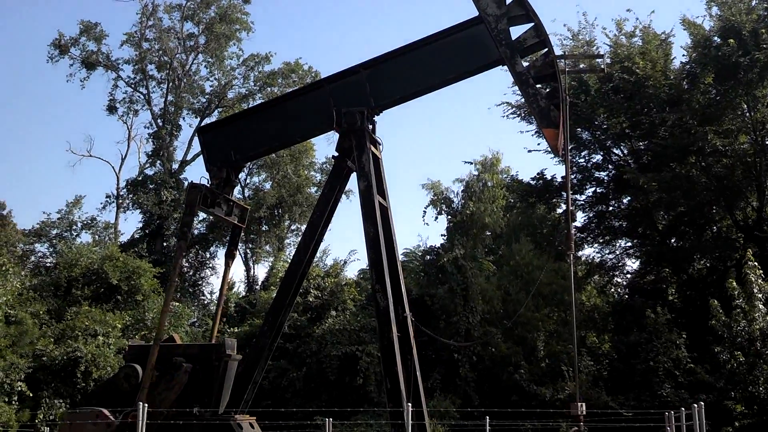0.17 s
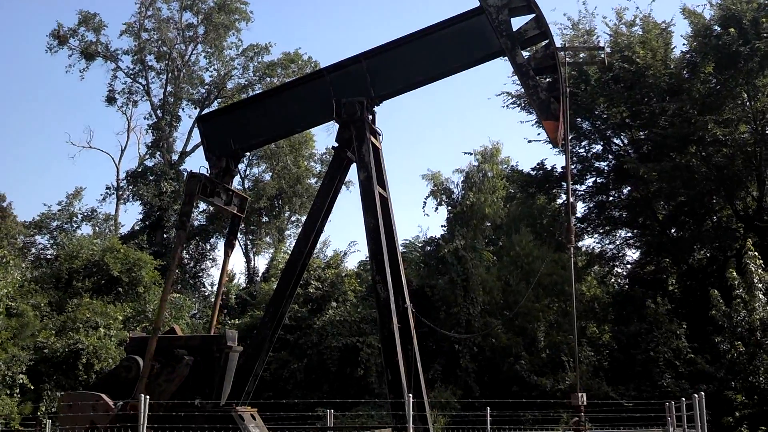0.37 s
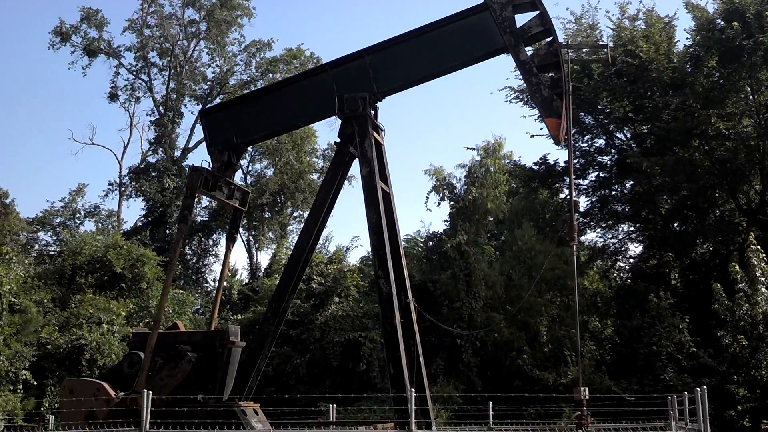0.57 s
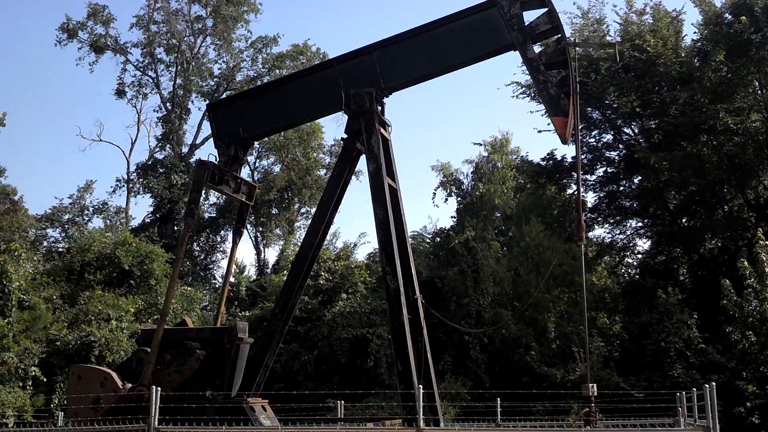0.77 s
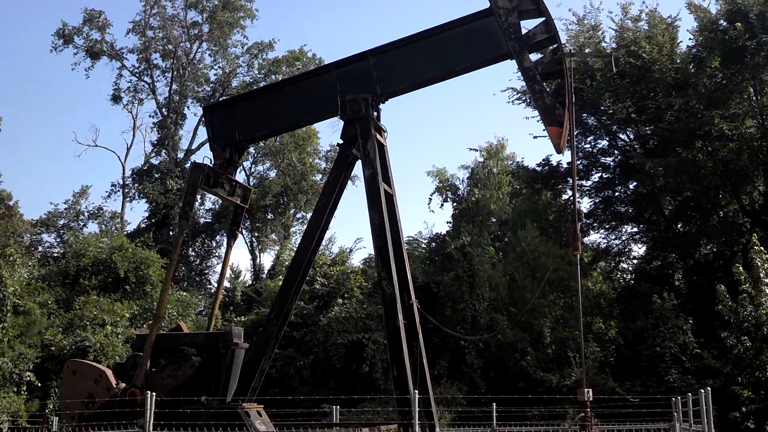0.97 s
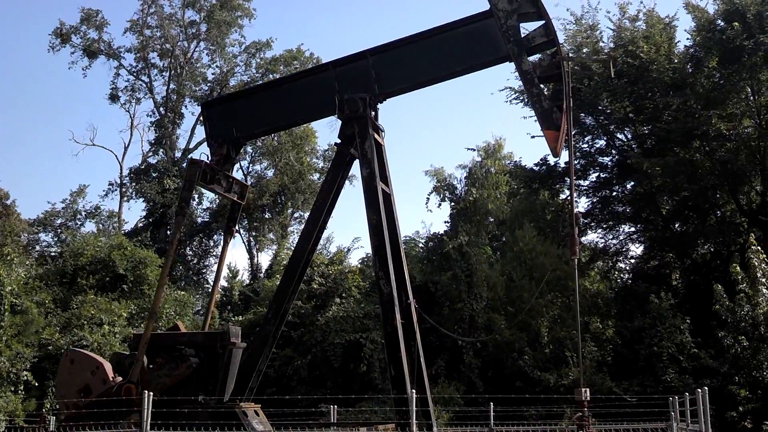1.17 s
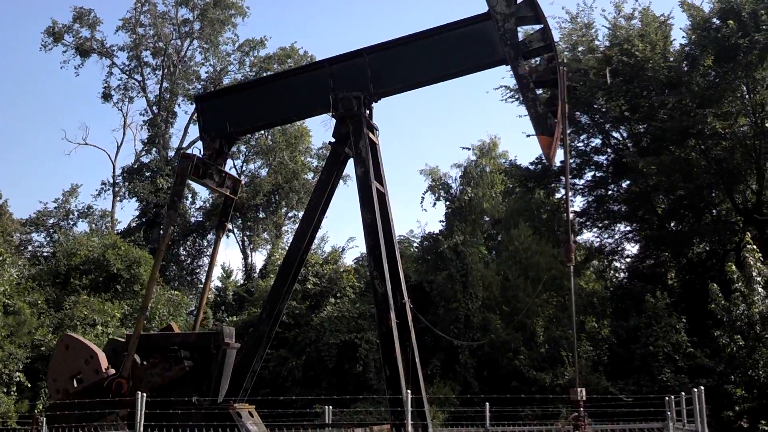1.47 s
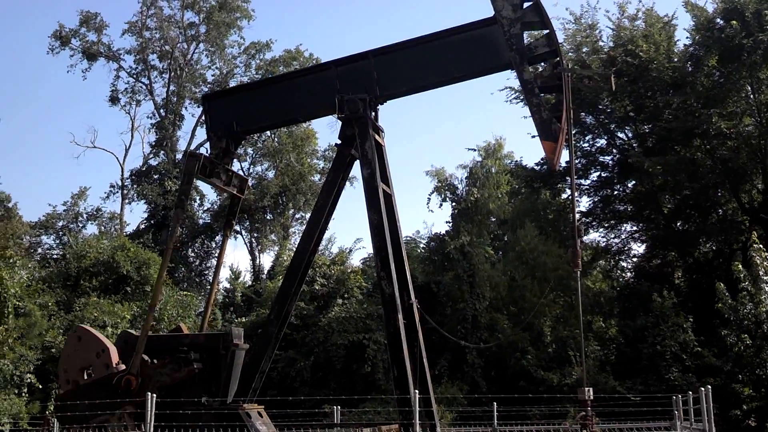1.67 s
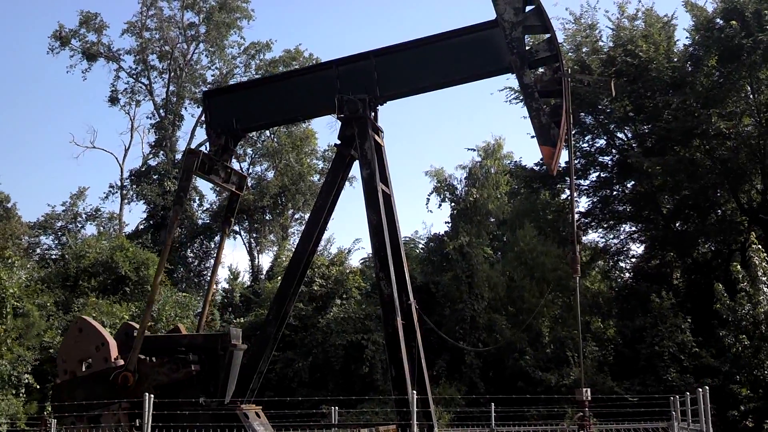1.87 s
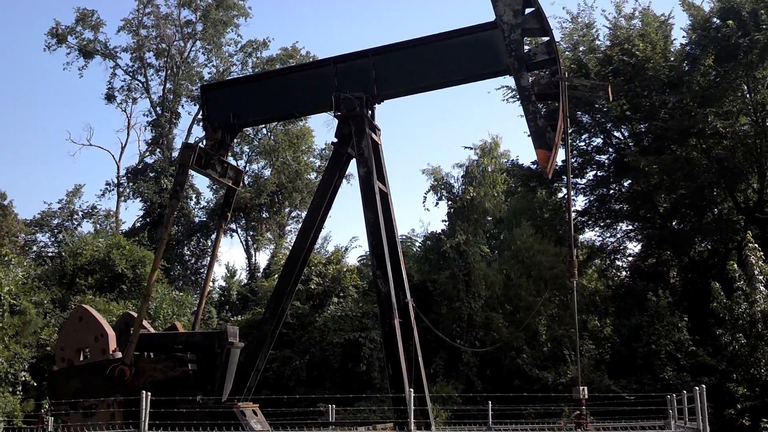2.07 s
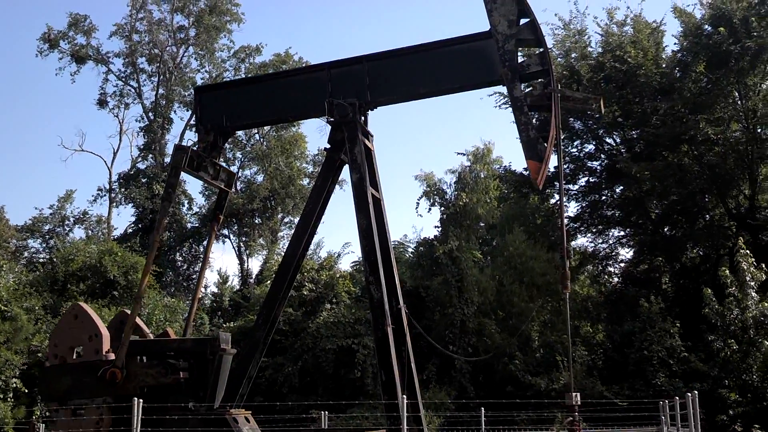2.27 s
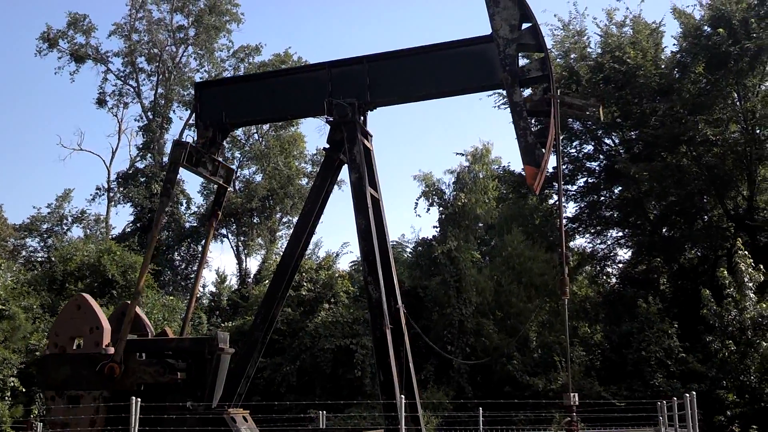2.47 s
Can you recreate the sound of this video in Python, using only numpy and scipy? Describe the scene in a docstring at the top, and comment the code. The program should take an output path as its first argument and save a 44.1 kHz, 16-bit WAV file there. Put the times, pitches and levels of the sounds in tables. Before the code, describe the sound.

A pumpjack works slowly beside trees: a wavering high electric motor whine near 4 kHz, soft gear whine on the left, low rumble and drone on the right, thin hiss, two dry ticks; wide stereo microphone outdoors.

```python
"""A pumpjack nods slowly at the edge of a wood, over broad rumble and drone (right) and thin hiss.
From 0 s its inverter-fed motor sings near 4 kHz: a comb of sines, spaced by the drive frequency, each fading alone.
Gear sines whine softly on the left; band noise, throbbing with the pulley, is the belt swish. A dry tick at 0.5 s.
The comb fans out and the whine rises to 1.3 s, then both sink back; a weaker tick at 1.6 s.
From then a faint insect rasp of pulsed noise grows; one rising chip at 2 s; the gear whine peaks at 2.4 s."""
import sys
import numpy as np
from scipy import signal
from scipy.fft import rfft, irfft
from scipy.io import wavfile

SR = 44100
rng = np.random.default_rng(int(sys.argv[2]) if len(sys.argv) > 2 else 0)


def inscribe(sig):
    """Save sig as 16-bit PCM at rate SR to the path in sys.argv[1].

    A 1-D sig is mono; a 2-D sig holds one channel per row.
    Samples are clipped to [-1, 1] before scaling.
    """
    pcm = np.round(np.clip(np.atleast_2d(sig).T, -1, 1) * 32767)
    wavfile.write(sys.argv[1], SR, pcm.astype(np.int16))


N = 115983
T = np.arange(N) / SR
HZ = np.fft.rfftfreq(N, 1 / SR)


def amp(db):
    """Decibels to gain."""
    return 10 ** (np.asarray(db) / 20)


def unit(x):
    """Scales to rms 1."""
    return x / np.sqrt(np.mean(x ** 2) + 1e-20)


def curve(rows, axis=1):
    """One column of a time table at every sample."""
    rows = np.array(rows)
    return np.interp(T, rows[:, 0], rows[:, axis])


def spectrum(rows, axis=1):
    """One column of a frequency table at every bin, on a log frequency axis."""
    rows = np.array(rows)
    return np.interp(np.log(HZ + 1), np.log(rows[:, 0] + 1), rows[:, axis])


def noise(gain):
    """Noise of rms 1 with the given colour."""
    return unit(irfft(rfft(rng.standard_normal(N)) * gain, N))


def band(hz, width_hz):
    """Noise of rms 1 in one soft-edged band."""
    return noise(np.exp(-.5 * ((HZ - hz) / width_hz) ** 2))


def wander(corner_hz):
    """Random curve of rms 1, low-passed at the corner."""
    return noise((HZ > 0) / (1 + (HZ / corner_hz) ** 4))


def angle(hz):
    """Running phase [rad] of a frequency or frequency curve."""
    return 2 * np.pi * np.cumsum(hz * np.ones(N)) / SR


def tone(hz, rms_db, drift_rad, drift_hz):
    """A sine at an rms level whose phase drifts at random."""
    phase = angle(hz) + drift_rad * wander(drift_hz) + 2 * np.pi * rng.random()
    return np.sqrt(2) * amp(rms_db) * np.cos(phase)


def flutter(db, hz):
    """Gain of rms 1 that trembles at random (dB against its steady part)."""
    return unit(1 + amp(db) * wander(hz))


# part of each motor tone arrives scattered (dB against the clean part)
FLUTTER_DB, FLUTTER_HZ = -17, 30
DRIFT_RAD, DRIFT_HZ = .75, 1.5


def motor_tone(hz, db):
    """One motor tone: drifts slowly against the others, flutters in level and phase."""
    shiver_hz = amp(FLUTTER_DB) * np.gradient(wander(FLUTTER_HZ)) * SR / (2 * np.pi)
    drifting = tone(hz + shiver_hz, db, DRIFT_RAD, DRIFT_HZ)
    return drifting * flutter(FLUTTER_DB, FLUTTER_HZ)


# stroke, also drives the gears: (time [s], drive frequency [Hz], gear whine [Hz])
STROKE = [(0, 27.8, 447), (.25, 27.8, 449), (.45, 28.2, 457), (.7, 28.9, 468), (1, 29.4, 480),
          (1.3, 30.15, 492), (1.55, 29.8, 489), (1.75, 28.6, 471), (1.9, 28, 455), (2.08, 27.55, 443),
          (2.3, 27.95, 447), (2.63, 27.8, 447)]
# motor load, also moves hiss and rumble: (time [s], level [dB])
LOAD = [(0, -0.5), (.5, 0.5), (1.1, 0.5), (1.6, 1), (2, 2.5), (2.35, 2), (2.63, 2)]
# strongest side tones at +3, +1, -3, +9 drive frequencies, before trim: (time [s], level [dB])
TONE_UP_3 = [(0.0, -57), (0.13, -38.5), (0.36, -42), (0.53, -79), (0.581, -38), (0.87, -82), (0.94, -43),
             (1.26, -50.5), (1.42, -38), (1.49, -42.5), (1.52, -52.5), (1.69, -41), (1.95, -47),
             (2.08, -42), (2.13, -54), (2.17, -39), (2.38, -31), (2.45, -40), (2.57, -42), (2.63, -46)]
TONE_UP_1 = [(0.0, -48), (0.26, -42), (0.38, -47), (0.54, -45), (0.88, -56), (0.96, -43), (1.2, -54),
             (1.45, -44), (1.63, -48), (1.75, -57), (2.03, -54), (2.1, -44), (2.32, -52), (2.4, -44),
             (2.63, -45)]
TONE_DOWN_3 = [(0.0, -53), (0.13, -44), (0.23, -56), (0.28, -49), (0.53, -45), (0.64, -53), (0.79, -48),
               (1.21, -55), (1.42, -47), (1.63, -56), (1.7, -47), (1.81, -55), (2.01, -44), (2.12, -56),
               (2.63, -56)]
TONE_UP_9 = [(0.0, -52), (0.68, -54), (0.77, -48), (1.06, -56), (1.29, -48), (1.48, -53), (1.57, -46),
             (1.71, -54), (2.11, -46), (2.29, -54), (2.37, -49), (2.44, -55), (2.63, -48)]
# stroke stages, lightly loaded, top speed, heavily loaded: times [s]
STAGES_S = [.4, 1.4, 2.25]
# weaker side tones, before fading: (drive multiple added to switching rate [-], level at each stage [dB] x 3)
SIDE_TONES = [(-21, -74, -77, -69), (-19, -62, -66, -60), (-15, -73, -74, -64), (-13, -64, -60, -55),
              (-9, -59, -62, -58), (-7, -68, -72, -63), (-5, -58, -54, -61), (-1, -58, -52, -52),
              (5, -52, -49, -48), (7, -62, -62, -61), (11, -64, -63, -55), (13, -69, -68, -61),
              (15, -68, -69, -63), (17, -76, -74, -67), (21, -67, -76, -65)]
# overtones, before load: (switching multiple [-], drive multiple added [-], level [dB])
OVERTONES = [(2, -8, -77), (2, -4, -74), (3, -3, -78), (3, 3, -79)]
SWITCH_HZ, STRONG_TRIM_DB = 3999, -.5
FADE_DB, FADE_HZ = 4.5, 3.5


def motor():
    """The inverter's switching tones, split by the drive frequency, ring the motor casing."""
    drive_hz, load_db = curve(STROKE), curve(LOAD)
    out = np.zeros(N)
    for k, level in [(3, TONE_UP_3), (1, TONE_UP_1), (-3, TONE_DOWN_3), (9, TONE_UP_9)]:
        out += motor_tone(SWITCH_HZ + k * drive_hz, curve(level) + STRONG_TRIM_DB)
    for k, *levels in SIDE_TONES:
        fade_db = FADE_DB * np.tanh(wander(FADE_HZ))
        out += motor_tone(SWITCH_HZ + k * drive_hz, np.interp(T, STAGES_S, levels) + fade_db)
    for m, k, db in OVERTONES:
        out += motor_tone(m * SWITCH_HZ + k * drive_hz, db + load_db)
    return np.array([out, out])


# left gear tones, before waver: (time [s], whine level [dB], upper partner level [dB])
GEAR = [(0, -58, -49), (.3, -51, -54), (.55, -54, -60), (.73, -47, -60), (.88, -55, -58), (1.08, -48, -48),
        (1.22, -46, -58), (1.42, -41.5, -57), (1.65, -49, -49), (1.84, -57, -62), (1.94, -44, -60),
        (2.12, -43.5, -44.5), (2.28, -41, -38.5), (2.4, -35.5, -48), (2.53, -40, -47), (2.63, -48, -50)]
UPPER_RATIO = 1.12
GEAR_FLUTTER_DB, GEAR_FLUTTER_HZ = -12, 14
CASE_HZ, CASE_DB = 682, -10.5  # dB against the whine's table level


def gears(right_db=-9, waver_db=3.0, waver_hz=16.0):
    """Two gear tones rise and fall with the stroke; the gearbox rings along at a fixed pitch."""
    hz, db = curve(STROKE, axis=2), curve(GEAR)
    whine = np.zeros(N)
    for tone_hz, level in [(hz, db), (UPPER_RATIO * hz, curve(GEAR, axis=2))]:
        whine += tone(tone_hz, level + waver_db * wander(waver_hz), drift_rad=.13, drift_hz=4.3)
    ring = tone(CASE_HZ, db + CASE_DB, drift_rad=1.0, drift_hz=9.5)
    left = whine * flutter(GEAR_FLUTTER_DB, GEAR_FLUTTER_HZ) + ring
    return np.array([left, amp(right_db) * left])


BELT_HZ, BELT_WIDTH_HZ, BELT_DB = 2400, 290, -57.5
PULLEY_HZ, PULLEY_PEAK_S, BELT_THROB_DB = 4.8, 1.245, 3.5


def belt():
    """Band noise swishes once per turn of the pulley."""
    throb = np.cos(2 * np.pi * PULLEY_HZ * (T - PULLEY_PEAK_S))
    return band(BELT_HZ, BELT_WIDTH_HZ) * amp(BELT_DB + BELT_THROB_DB * throb)


# right-hand drone tones, before swell and waver: (frequency [Hz], level [dB])
DRONE = [(77.3, -54), (125.8, -46.5), (156, -41), (232.5, -44.5), (251.8, -44), (302.6, -47), (378, -52),
         (553.5, -54.5)]
DRONE_DRIFT_RAD, DRONE_DRIFT_HZ = .55, 5
DRONE_SWELL_DB, DRONE_SWELL_HZ = 3.5, 3


def drone(left_db=-15, waver_db=1.47, echo_gain=0.71):
    """Low wavering machine tones from the right; the left hears them partly off the trees."""
    direct, echoed = np.zeros((2, N))
    for hz, db in DRONE:
        level = db + DRONE_SWELL_DB * np.tanh(wander(DRONE_SWELL_HZ))
        direct += tone(hz, level + waver_db * wander(15.5), DRONE_DRIFT_RAD, DRONE_DRIFT_HZ)
        echoed += tone(hz, level + waver_db * wander(12), DRONE_DRIFT_RAD, DRONE_DRIFT_HZ)
    return np.array([amp(left_db) * (direct + echo_gain * echoed), direct])


# rumble colour: (frequency [Hz], relative density [dB])
RUMBLE = [(20, -36), (55, -24), (72, -11), (120, 0.5), (200, 2), (275, -0.5), (325, 5.5), (430, -3),
          (700, -4.5), (1000, -8.5), (1300, -16.5), (1600, -27), (1900, -17), (2400, -24.5), (5000, -135)]
# rumble's left side: (frequency [Hz], level against the right [dB], likeness to the right [0-1])
RUMBLE_LEFT = [(60, -12, 0.3), (166, -12, 0.84), (388, -11.5, 0.95), (620, -9, 0.43), (990, -9.5, 0.85),
               (1440, 2.5, 0.92), (1940, -33, 0)]
RUMBLE_DB = -35


def rumble(swell_db=-0.4, swell_hz=4.1, load_share=0.16):
    """Broad low machine noise, stronger on the right, partly alike on both sides."""
    colour = amp(spectrum(RUMBLE))
    right, other = noise(colour), noise(colour)
    same = np.clip(spectrum(RUMBLE_LEFT, axis=2), 0, 1)
    mixed = same * rfft(right) + np.sqrt(1 - same ** 2) * rfft(other)
    left = irfft(mixed * amp(spectrum(RUMBLE_LEFT)), N)
    level_db = RUMBLE_DB + swell_db * wander(swell_hz) + load_share * curve(LOAD)
    return np.array([left, right]) * amp(level_db)


# insect rasp, before waver: (time [s], level [dB])
RASP = [(0, -74), (1.4, -76), (1.65, -63), (1.9, -66), (2.0, -61.5), (2.63, -60.5)]
RASP_HZ, RASP_WIDTH_HZ, RASP_RATE_HZ, RASP_DECAY_S = 6900, 850, 100, .003
CHIP_S, CHIP_LENGTH_S, CHIP_HZ, CHIP_RISE_HZ_PER_S, CHIP_DB = 1.963, .007, 6900, 135000, -50.5  # peak dB


def wood():
    """An insect's rasp is band noise in quick, uneven decaying ticks; one chip is a rising sine burst."""
    turns = angle(RASP_RATE_HZ) / (2 * np.pi) + .3 * wander(25)
    pulses = unit(np.exp(-(turns % 1) / (RASP_RATE_HZ * RASP_DECAY_S)))
    level_db = curve(RASP) + 1.0 * wander(9.5)
    rasp = band(RASP_HZ, RASP_WIDTH_HZ) * pulses * amp(level_db)
    t = T - CHIP_S
    swing = np.cos(2 * np.pi * (CHIP_HZ + CHIP_RISE_HZ_PER_S * t / 2) * t)
    chip = np.exp(-(t / CHIP_LENGTH_S) ** 2) * swing
    return rasp + amp(CHIP_DB) * chip


# dry ticks: (time [s], peak level [dB])
TICKS = [(.4845, -26.5), (1.635, -34)]
TICK_HZ, TICK_S = 11300, .00006


def ticks():
    """Very short, high sine bursts under a bell-shaped envelope."""
    out = np.zeros(N)
    for start_s, peak_db in TICKS:
        t = T - start_s
        out += amp(peak_db) * np.exp(-(t / TICK_S) ** 2) * np.cos(2 * np.pi * TICK_HZ * t)
    return np.array([out, out])


# hiss colour: (frequency [Hz], relative density [dB])
HISS = [(300, -4), (1200, -3.5), (1650, -3.5), (2400, -2.5), (3200, 5.5), (3700, -5.5), (4100, -0.5),
        (4500, -2.5), (5300, -2.5), (6200, -8.5), (7200, -11.5), (7800, -7.5), (8200, 1.5), (8850, -14),
        (11000, -18), (12100, -12), (13000, -18.5), (15700, -14)]
HISS_DB = -47.5  # shared part, before load


def hiss(apart_gain=0.063):
    """Casing and air hiss follows the load; nearly the same noise on both sides."""
    colour = amp(spectrum(HISS))
    both = noise(colour) + apart_gain * np.array([noise(colour), noise(colour)])
    return both * amp(HISS_DB + curve(LOAD))


def scene():
    """All sources at the microphone."""
    return motor() + gears() + belt() + drone() + rumble() + wood() + ticks() + hiss()


# wide stereo microphone turns bands against each other: (frequency [Hz], left's lead [half turns])
WIDENING = [(0, 1), (70, 1), (150, .6), (270, .55), (350, .28), (700, .13), (1150, 0), (1560, 0),
            (1800, -.55), (2350, -1), (3100, -1), (3400, -.45), (3650, 0), (4300, 0), (4700, .3), (5200, 1),
            (5900, 1), (6400, 0), (7400, 0), (8250, 1), (8900, 1), (9000, 0), (10300, 0), (10400, 1),
            (11500, 1), (12100, 0), (13000, 0), (13200, 1), (14200, 1), (14600, 0), (16000, 0)]
EDGE_HZ = 15780


def record(dry):
    """Stereo widening by phase turns on the right, then a low-pass."""
    turn = np.exp(-1j * np.pi * np.interp(HZ, *np.transpose(WIDENING)))
    wide = np.array([dry[0], irfft(rfft(dry[1]) * turn, N)])
    low_pass = signal.firwin(1023, EDGE_HZ, window=("kaiser", 9), fs=SR)
    return signal.oaconvolve(wide, low_pass[None], "same")


dry = scene()
out = record(dry)
inscribe(out)
```